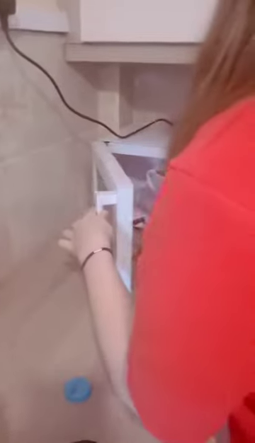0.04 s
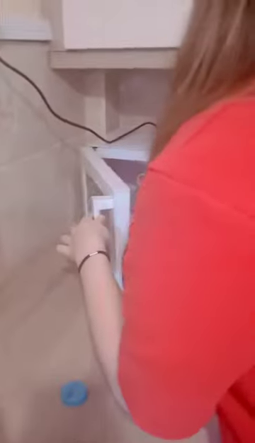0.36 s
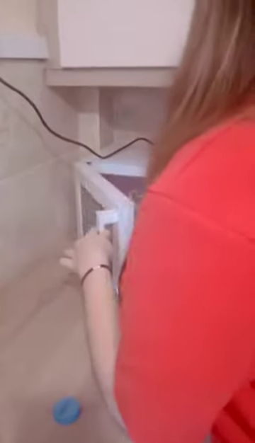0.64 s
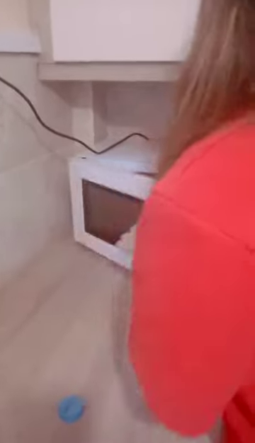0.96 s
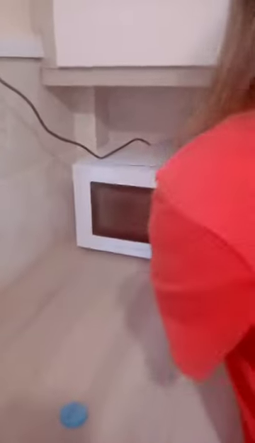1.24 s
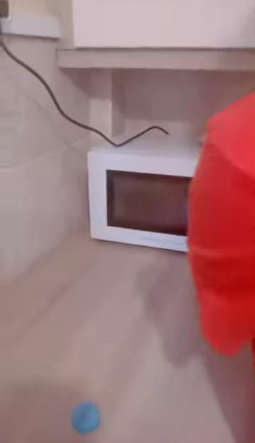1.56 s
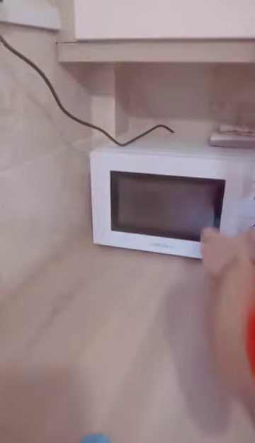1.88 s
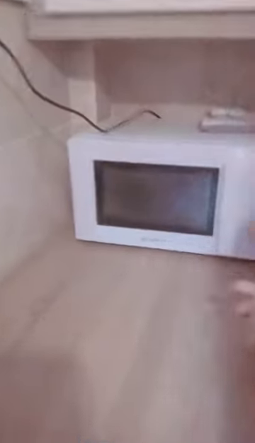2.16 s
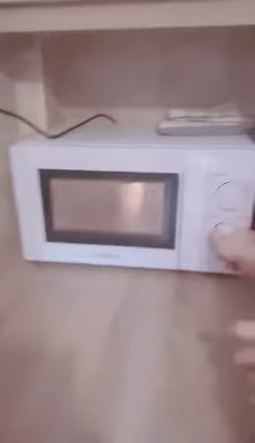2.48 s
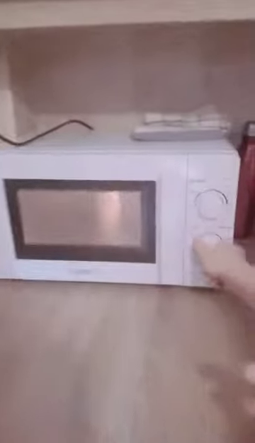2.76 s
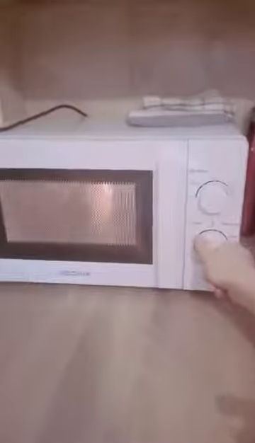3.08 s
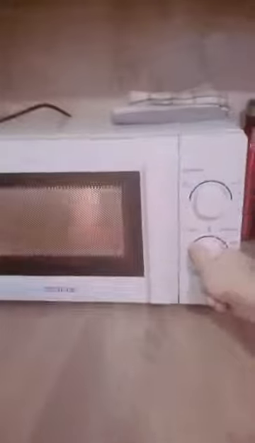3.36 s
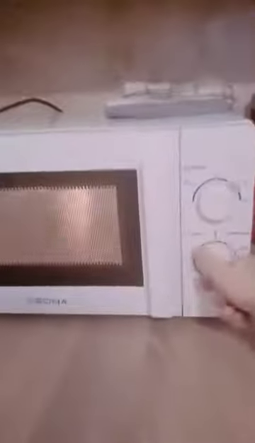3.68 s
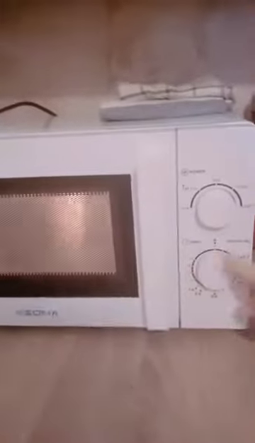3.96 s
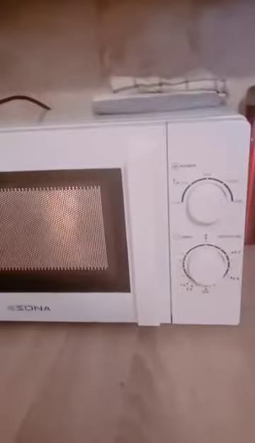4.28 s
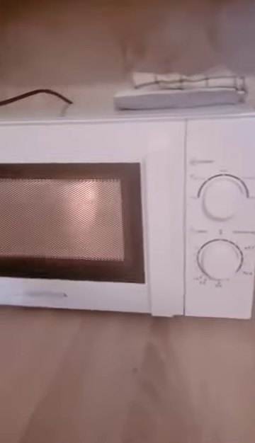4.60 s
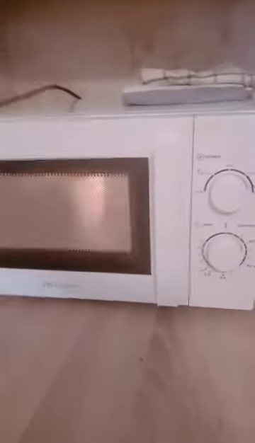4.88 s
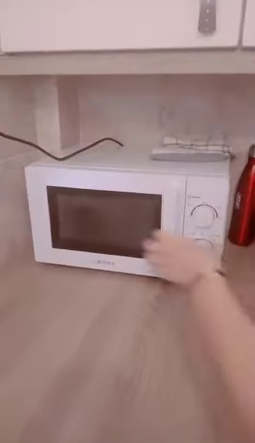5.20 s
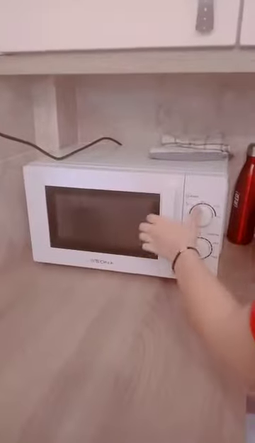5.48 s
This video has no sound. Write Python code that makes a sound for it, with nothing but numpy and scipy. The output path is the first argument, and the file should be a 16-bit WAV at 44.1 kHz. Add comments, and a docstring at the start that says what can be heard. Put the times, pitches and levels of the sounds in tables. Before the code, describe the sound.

Ringing glass, a plastic door banging shut, then a microwave oven humming and whirring until it stops and the latch clicks open.

```python
"""A microwave oven runs in a small kitchen: iron cores hum on the mains while the fan gathers speed,
with blade tones, rushing air and motor rumble. Before it starts, a dish clunks onto the glass tray and
rings, the plastic door slams into its latch, thudding the steel case, and the timer knob is turned.
The oven stops dead and the latch springs open. Clothes rustle softly over the room tone."""
import sys
import numpy as np
from scipy import signal
from scipy.fft import rfft, irfft, next_fast_len
from scipy.io import wavfile
from scipy.ndimage import uniform_filter1d, minimum_filter1d, map_coordinates

SR = 44100
rng = np.random.default_rng(int(sys.argv[2]) if len(sys.argv) > 2 else 0)


def waveform_to_disk(signal):
    """Save audio, clipped to [-1, 1], as 16-bit WAV at the path in sys.argv[1]."""
    frames = np.transpose(np.atleast_2d(signal))
    scaled = np.clip(frames, -1, 1) * 32767
    samples = np.round(scaled).astype(np.int16)
    wavfile.write(sys.argv[1], SR, samples)


N = 248800
TIME = np.arange(N) / SR
AGE = TIME[:SR]  # time since a hit (s)
START_S, STOP_S = 2.45, 5.18  # the oven runs between these times
LET_GO_S, LET_GO_SPAN_S = 3.81, 0.033  # the hand leaves the knob and stops damping the case
FULL_SPEED_HZ = 166  # the fan's top blade rate


def amp(db):
    """Decibels to gain."""
    return 10 ** (np.asarray(db) / 20)


def unit(x):
    """x at rms 1."""
    return x / np.sqrt(np.mean(x ** 2) + 1e-20)


def pan(db):
    """Left and right gains for a left-minus-right level."""
    return amp(np.outer([.5, -.5], db))


def along(points, hz):
    """Read a breakpoint curve on a log frequency axis."""
    freqs, values = np.transpose(points)
    return np.interp(np.log(hz + 1), np.log(freqs + 1), values)


def bumps(peaks, hz):
    """The boost in dB from a set of resonant peaks."""
    return sum(db / (1 + (2 * (hz - centre) / width) ** 2) for centre, width, db in peaks)


def wobble(rate):
    """A smooth random modulator, rate knots a second."""
    return map_coordinates(rng.standard_normal(int(N * rate / SR) + 4), [TIME * rate])


def filtered(x, response):
    """Zero-phase EQ; response gives the gain at each frequency."""
    size = x.shape[-1]
    padded = next_fast_len(size + 8192)
    return irfft(rfft(x, padded) * response(np.fft.rfftfreq(padded, 1 / SR)), padded)[..., :size]


def add(track, s, sound):
    """Mix a sound into the track from time s on."""
    part = track[:, round(s * SR):][:, :sound.shape[-1]]
    part += sound[:, :part.shape[-1]]


# Left-right likeness in the room: f/Hz, correlation
STEREO_LIKENESS = [(130, 0.97), (250, 0.84), (500, 0.76), (1000, 0.25), (2000, 0.038), (14000, 0.046)]
def mid_side(hz):
    """Mid and side gains: near mono in the bass, wide in the treble."""
    angle = np.arccos(np.clip(along(STEREO_LIKENESS, hz), -1, 1)) / 2
    return np.cos(angle), np.sin(angle)


# Default pan of noises and rings: f/Hz, left-right/dB
ROOM_PAN = [(110, -1.5), (500, -1), (1290, -1.5), (2380, 3), (4400, -5), (8120, 1.5)]
def noise(colour, size, pan_curve=ROOM_PAN):
    """Stereo noise at rms 1, shaped by the EQ curve colour (dB)."""
    mid, side = filtered(rng.standard_normal((2, size)), lambda hz: amp(colour(hz)) * mid_side(hz))
    stereo = np.array([mid + side, mid - side])
    return unit(filtered(stereo, lambda hz: pan(along(pan_curve, hz))))


def ring(modes, blur, attack, pan_curve=ROOM_PAN):
    """Decaying modes; reflections blur each one and shift its phase between the ears."""
    out = np.zeros((2, SR))
    for hz, db, t60 in modes:
        mid_gain, side_gain = mid_side(hz)
        scatter = signal.resample(rng.standard_normal((2, 2, 90)), SR, axis=2)
        wave = (1 + blur * (scatter[0] + 1j * scatter[1])) * np.exp(2j * np.pi * hz * AGE)
        mid, side = mid_gain * wave[0].imag, side_gain * wave[1].real
        out += amp(db - 60 * AGE / t60) * pan(along(pan_curve, hz)) * [mid + side, mid - side]
    return out * (1 - np.exp(-AGE / attack))


# Reverb time of the kitchen: f/Hz, t60/s
ROOM_DECAY = [(100, 0.8), (250, 0.64), (600, 0.37), (2000, 0.32), (6000, 0.31), (14000, 0.28)]
def knock(colour, t60, room_db, attack):
    """A short burst of dense vibration with a room tail that dies band by band."""
    direct = noise(colour, SR) * amp(-60 * AGE / t60)
    hz, t, bands = signal.stft(noise(colour, SR), SR, nperseg=256)
    decay = amp(-60 * t / along(ROOM_DECAY, hz)[:, None])
    tail = signal.istft(bands * decay, SR, nperseg=256)[1][:, :SR]
    return (direct + amp(room_db) * tail) * (1 - np.exp(-AGE / attack))


# EQ of the room tone's body and of its hiss: f/Hz, level/dB
BODY_EQ = [(25, -13), (45, -25.5), (160, -15.5), (260, -16), (400, -18), (800, -16.5), (1300, -23),
           (2170, -15.5), (3200, -26.5), (4750, -39), (15000, -41.5)]
HISS_EQ = [(2000, -23.5), (3500, -10), (5300, -0.5), (8000, -14), (10500, -17.5), (14000, -13)]
# Clothes rustle as the arm moves: centre t/s, length/s, body level/dB, hiss level/dB
CLOTH_SWELLS = [(0.082, 0.24, -59.5, -79), (1.251, 0.9, -60, -73), (2.086, 0.2, -57.5, -66),
                (3.197, 1.5, -59.5, -69), (5.467, 0.44, -73.5, -69)]
def background():
    """Room tone and thin hiss swell with each rustle; a faint tone fades as the dish lands."""
    body_gain, hiss_gain = amp(-64.5), amp(-82)  # the kitchen at rest
    for s, length, body_db, hiss_db in CLOTH_SWELLS:
        swell = np.exp(-2 * ((TIME - s) / length) ** 2)
        body_gain = np.hypot(body_gain, amp(body_db) * swell)
        hiss_gain = np.hypot(hiss_gain, amp(hiss_db) * swell)
    body = body_gain * noise(lambda hz: along(BODY_EQ, hz), N)
    hiss = hiss_gain * noise(lambda hz: along(HISS_EQ, hz), N)
    tone = amp(-66.5) * np.sin(2 * np.pi * 340.5 * TIME) * np.interp(TIME, [.56, .62], [1, 0])
    return body + hiss + tone


# Cues for knob knocks, the contact closing and the motors' jolts: t/s, level/dB
KNOB_HITS = [(2.198, -51), (2.252, -50), (2.301, -48), (2.376, -42.5), (2.431, -43.5), (2.612, -47)]
CONTACT_HITS = [(2.475, -50)]
MOTOR_JOLTS = [(2.435, -37.5), (2.489, -40)]
# EQ of the knob and of the contact: f/Hz, level/dB
KNOB_EQ = [(140, 4.5), (230, -4), (430, 3), (880, -4), (1250, -20), (4000, -38.5)]
CONTACT_EQ = [(1000, -7), (2400, -6), (5800, -7), (8000, -11.5)]
# Modes of the motor mounts: f/Hz, level/dB, t60/s
MOUNT_MODES = [(133.7, -4, 0.4), (274.5, 3, 0.18)]
def timer():
    """The knob knocks round, its contact ticks, current jolts the motors; letting go jolts the case."""
    out = np.zeros((2, N))
    for s, db in KNOB_HITS:
        turn = knock(lambda hz: along(KNOB_EQ, hz), t60=.04, room_db=-6, attack=.0004)
        add(out, s, amp(db) * turn)
    for s, db in CONTACT_HITS:
        tick = knock(lambda hz: along(CONTACT_EQ, hz), t60=0.05, room_db=-1.5, attack=0.00082)
        add(out, s, amp(db) * tick)
    for s, db in MOTOR_JOLTS:
        add(out, s, amp(db) * ring(MOUNT_MODES, blur=.12, attack=0.0029))
    add(out, LET_GO_S - LET_GO_SPAN_S, amp(-38.5) * ring(MOUNT_MODES, blur=.3, attack=.01))
    return out


# The dish lands and rocks: t/s, clunk level/dB, ring level/dB
DISH_HITS = [(0.5594, -16.5, -25), (0.563, -18, -14.5), (0.581, -27, -40), (0.69, -32, -55)]
# Clunk of the steel cavity: f/Hz, level/dB
CAVITY_EQ = [(60, -23.5), (130, -21), (400, -15.5), (520, -14.5), (870, 2.5), (1400, -21), (1850, -5.5),
             (2550, -16), (3150, -7), (3550, -28), (5100, -26.5), (8500, -67)]
# Modes of dish and tray: f/Hz, level/dB, t60/s
GLASS_MODES = [(514, -9, .42), (575, -11, .46), (648, -11, .35), (677, -13, .35), (796, -14, .33),
               (848, -6, .35), (990, -10, .25), (1768, -6, .33), (1828, 3.5, .18), (1884, -7, .37),
               (1915, -7, .35), (2258, -10, .31), (2315, -9, .27), (2781, -15, .28), (3005, -4, .38),
               (3060, -8, .36), (4502, -17, .33), (4999, -7.5, .32), (5030, -13, .32), (6191, -25, .31),
               (7090, -36, .32)]
# Pan of those modes: f/Hz, left-right/dB
GLASS_PAN = [(520, -1), (850, -4), (1850, 2.5), (3000, -0.5), (5000, -3.5), (7000, 3.5)]
def dish():
    """The dish clunks and rings on the glass tray; later it pings once as the tray turns."""
    out = np.zeros((2, N))
    hardest_db = max(row[1] for row in DISH_HITS)
    for s, clunk_db, ring_db in DISH_HITS:
        tilt_db = 1.87 - 0.37 * (hardest_db - clunk_db)  # per octave: softer hits are duller
        colour = lambda hz: along(CAVITY_EQ, hz) + tilt_db * np.log2(np.maximum(hz, 500))
        add(out, s, amp(clunk_db) * knock(colour, t60=0.069, room_db=-2.5, attack=0.00083))
        add(out, s, amp(ring_db) * ring(GLASS_MODES, blur=.29, attack=.002, pan_curve=GLASS_PAN))
    ping_s, ping_hz, ping_db = 2.904, 3000, -55
    add(out, ping_s, ring([(ping_hz, ping_db, .12)], blur=0.39, attack=0.0018))
    return out


# EQ of the plastic door: f/Hz, level/dB
DOOR_EQ = [(50, -46), (90, -19), (170, -8), (240, -19), (520, -11), (1150, -18), (1600, -20.5), (2450, -19),
           (3400, -33), (5200, -27), (10500, -60), (14000, -48.5)]
# Its resonances: f/Hz, width/Hz, boost/dB
DOOR_RESONANCES = [(840, 70, 3.5), (1240, 41, 6), (1910, 83, 4.5), (2355, 150, 5), (2856, 470, 6)]
def clatter(tilt_db):
    """One contact of the plastic door, tilted by tilt_db per octave through the mids."""
    def colour(hz):
        tilt = tilt_db * np.log2(np.clip(hz, 200, 2600))
        return along(DOOR_EQ, hz) + bumps(DOOR_RESONANCES, hz) + tilt
    return knock(colour, t60=0.12, room_db=-4.5, attack=0.0013)


def hook_scrape(end_s=1.629, length_s=.019, slips=4):
    """Just before the slam the hooks slip up their ramps, harder as the springs tighten."""
    out = np.zeros((2, N))
    for remaining in np.arange(1, slips + 1) / slips:
        add(out, end_s - remaining * length_s, amp(-28 - 14 * remaining) * clatter(tilt_db=2.5))
    return out


# Door hits: t/s, clatter level/dB, thud level/dB, tilt/(dB/octave), second hook's lag/s and gain/dB
DOOR_HITS = [(1.235, -50.5, -60.5, -1, 0.0074, -12), (1.395, -29, -40.5, 2, .014, 1.5),
             (1.629, -12.5, -13.5, 1.65, .011, -6.5), (1.824, -44.5, -47, -1, .03, -12.5),
             (5.569, -36, -40, 3, .005, 4)]
# Modes of the steel case: f/Hz, level/dB, t60/s
CASE_MODES = [(89.5, -3, .35), (144, 1.5, .27), (162, 3.5, .26), (190, -3, .27), (431, -7, .27),
              (504, -5.5, .23), (555, -6, .18), (649, -9, .23)]
def door(rebound_s=.037, rebound_db=-14):
    """Each hit thuds the case; two hooks strike in turn and the door rebounds once in its catch."""
    out = np.zeros((2, N))
    for s, db, thud_db, tilt_db, lag, second_db in DOOR_HITS:
        add(out, s, amp(thud_db) * ring(CASE_MODES, blur=.2, attack=.0026))
        for delay, contact_db in [(0, 0), (lag, second_db), (rebound_s, rebound_db)]:
            add(out, s + delay, amp(db + contact_db) * clatter(tilt_db))
    return out


# Bright snap of the hooks: f/Hz, level/dB
SNAP_EQ = [(1000, -21), (5500, 5), (10500, -9), (14000, -1.5)]
# The latch lets go, then springs open: t/s, level/dB
UNLATCH_HITS = [(5.5683, -44), (5.573, -37)]
# Modes of the sprung latch and its panel: f/Hz, level/dB, t60/s
LATCH_MODES = [(304, 5, 0.32), (912, -4.5, 0.2), (1275, -2, 0.12), (2320, 3.5, 0.086), (2700, -9, .15),
               (3104, 4.5, .13)]
def latch(snap_s=1.634):
    """The hooks snap home at the end of the slam; the latch rings when it springs open."""
    out = np.zeros((2, N))
    snap = knock(lambda hz: along(SNAP_EQ, hz), t60=0.073, room_db=-13.5, attack=0.00072)
    add(out, snap_s, amp(-27) * snap)
    for s, db in UNLATCH_HITS:
        add(out, s, amp(db) * ring(LATCH_MODES, blur=.3, attack=.0004))
    return out


def blade_rate(hz_per_s=99, knee=8):
    """The fan's blade rate in Hz: an even run-up that levels off at full speed."""
    ramp_hz = hz_per_s * np.maximum(TIME - START_S, 1 / SR)
    return ramp_hz / (1 + (ramp_hz / FULL_SPEED_HZ) ** knee) ** (1 / knee)


# EQ of the rumble: f/Hz, level/dB
RUMBLE_EQ = [(50, -20), (95, 1), (140, 1.5), (220, -6), (480, -10), (600, -13), (1000, -25.5), (3000, -40),
             (9000, -69.5)]
# Case resonance that the blade rate sweeps through: f/Hz, width/Hz, boost/dB
CASE_SHAKE = [(124, 51, 3.5)]
def motor():
    """Turntable drive and fan bearings rumble through the case, more with speed and at its resonance."""
    blade_hz = blade_rate()
    rumble_db = -48 - 12.5 * (1 - blade_hz / FULL_SPEED_HZ) + bumps(CASE_SHAKE, blade_hz)
    return amp(rumble_db) * noise(lambda hz: along(RUMBLE_EQ, hz), N)


def standing_waves(x, spacing_hz=48, drift_s=.3, depth_db=3.2):
    """Resonances between panels and walls colour each ear and drift as the listening spot moves."""
    hz, t, bands = signal.stft(x, SR, nperseg=2048)
    grid = np.meshgrid(hz / spacing_hz, t / drift_s, indexing="ij")
    knots = [int(axis.max()) + 2 for axis in grid]
    ripple = np.array([map_coordinates(rng.standard_normal(knots), grid) for ear in x])
    return unit(signal.istft(bands * amp(depth_db * ripple), SR, nperseg=2048)[1][:, :N])


# Blade tones at full speed: harmonic number, level/dB
BLADE_HARMONICS = [(1, -43), (2, -70), (3, -48)]
# Air through the vents: f/Hz, level/dB
AIR_EQ = [(50, -37), (95, -22), (150, -15), (220, -19.5), (300, -7.5), (370, -19.5), (560, -15),
          (900, -18.5), (1400, -22), (2400, -17.5), (3600, -36.5), (5200, -39), (9000, -55.5)]
# Duct resonances: f/Hz, width/Hz, boost/dB
DUCT_RESONANCES = [(568, 40, 8), (687, 74, 7), (817, 19, 8), (1034, 110, 5.5), (2180, 120, 2)]
# Pan of the air: f/Hz, left-right/dB
AIR_PAN = [(110, -13), (200, -7.5), (380, 10.5), (700, -2.5), (1290, 0.5), (2380, 2), (4400, -6),
           (8120, 2.5)]
def fan(onset_hz=100.4):
    """Blade tones come in and rise with speed, overtones last; the air grows as a power of speed."""
    blade_hz = blade_rate()
    speed_db = 20 * np.log10(blade_hz / FULL_SPEED_HZ)
    phase = 2 * np.pi * np.cumsum(blade_hz * (1 + 0.0095 * wobble(20))) / SR
    tones = np.zeros(N)
    for order, db in BLADE_HARMONICS:
        growth = 0.86 + 1.8 * (order - 1)  # dB per dB of speed
        tones += amp(db + growth * speed_db + 2.2 * wobble(14)) * np.sin(order * phase)
    singing = 1 / (1 + (onset_hz / blade_hz) ** 20)  # slow blades hardly sing
    air = standing_waves(noise(lambda hz: along(AIR_EQ, hz) + bumps(DUCT_RESONANCES, hz), N, AIR_PAN))
    air_db = -39.5 + 3.2 * speed_db + 0.78 * wobble(14)
    return np.sqrt(2) * singing * tones + amp(air_db) * air


# Partials of the mains hum: harmonic number, level/dB
HUM_HARMONICS = [(2, -50.5), (3, -57), (4, -60), (5, -57), (6, -45.5), (8, -65), (10, -63), (12, -72.5),
                 (14, -71), (18, -73.5), (20, -68.5), (40, -80.5)]
# The hum shifts with the listening spot: t/s, drone left-right/dB, gain at 100 Hz/dB
HUM_AUTOMATION = [(2.6, 3.5, -4.5), (3.7, 6.5, 5.5), (5.15, 6.5, -1.5)]
def hum(mains_hz=50):
    """Iron cores buzz at wavering mains harmonics; the case's 300 Hz drone swells once let go."""
    swell_db = np.interp(TIME, [LET_GO_S - LET_GO_SPAN_S / 2, LET_GO_S + LET_GO_SPAN_S / 2], [0, 6])
    times, *lanes = np.transpose(HUM_AUTOMATION)
    pan_db, low_db = [np.interp(TIME, times, lane) for lane in lanes]
    phase = 2 * np.pi * mains_hz * TIME
    out = np.zeros((2, N))
    for order, db in HUM_HARMONICS:
        drone_share = np.exp(-(order - 6) ** 2 / 2)  # only partials near the case's resonance
        level_db = db + drone_share * swell_db + (order == 2) * low_db + 0.19 * wobble(4.2)
        partial = amp(level_db) * np.sin(order * phase + 2 * np.pi * rng.random() + 0.079 * wobble(7))
        out += partial * pan(drone_share * pan_db)
    return np.sqrt(2) * out


def low_cut(x, corner_hz):
    """A steep microphone low cut takes the deep bass out of the knocks and the running oven."""
    return signal.sosfilt(signal.butter(6, corner_hz, "high", fs=SR, output="sos"), x)


def scene():
    """Handling sounds and room tone around the running oven, which fades in fast and stops dead."""
    handling = dish() + hook_scrape() + door() + timer() + latch()
    gate = np.clip((TIME - START_S) / .06, 0, 1) * np.clip((STOP_S - TIME) / .003, 0, 1)
    running = gate * (hum() + fan() + motor())
    return low_cut(handling + running, corner_hz=78.0) + background()


def record(dry):
    """A limiter holds the hardest hits under full scale; a brick-wall low-pass trims the top."""
    ceiling, top_hz = .86, 15600
    needed = np.minimum(1, ceiling / (np.abs(dry).max(axis=0) + 1e-9))
    gain = uniform_filter1d(minimum_filter1d(needed, size=200), size=200)
    return filtered(dry * gain, lambda hz: hz < top_hz)


dry = scene()
out = record(dry)
waveform_to_disk(out)
```